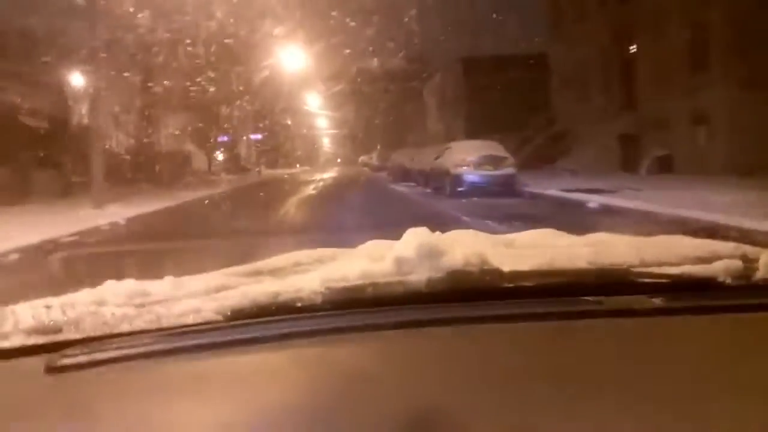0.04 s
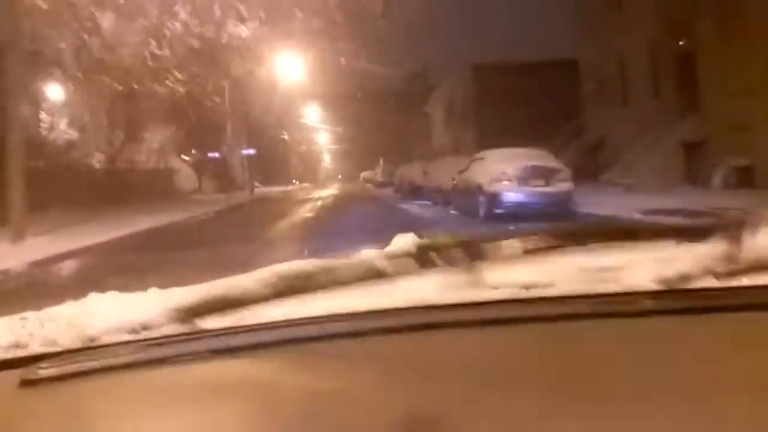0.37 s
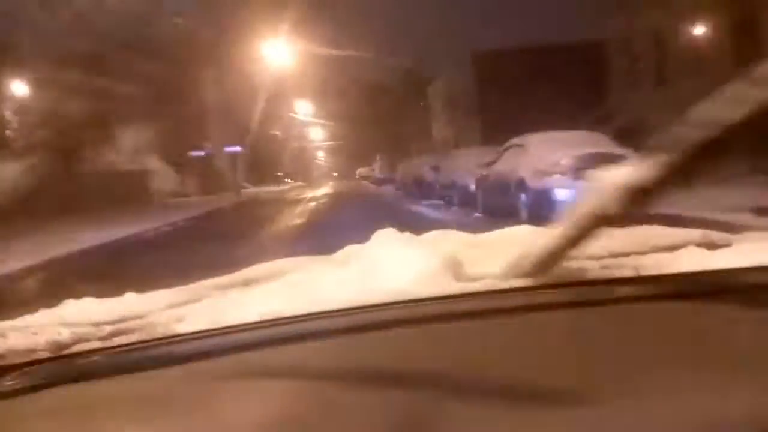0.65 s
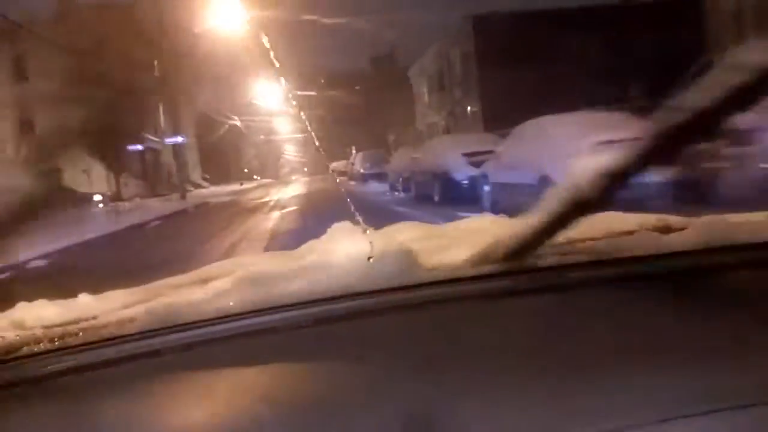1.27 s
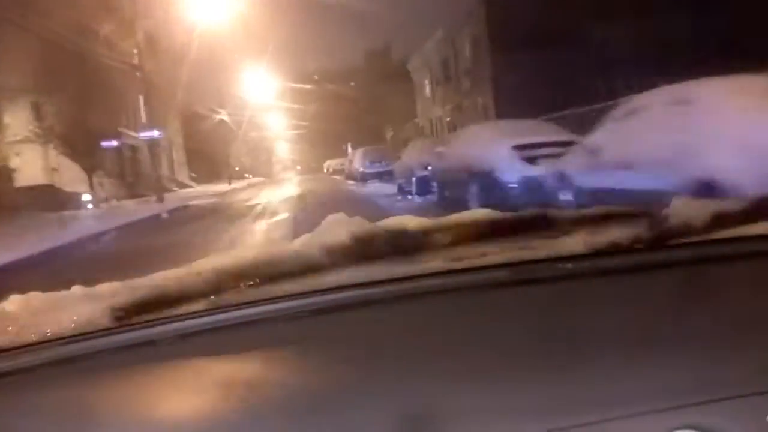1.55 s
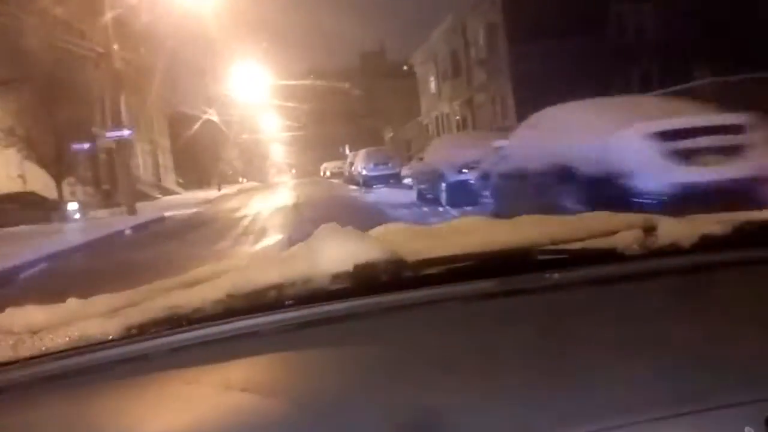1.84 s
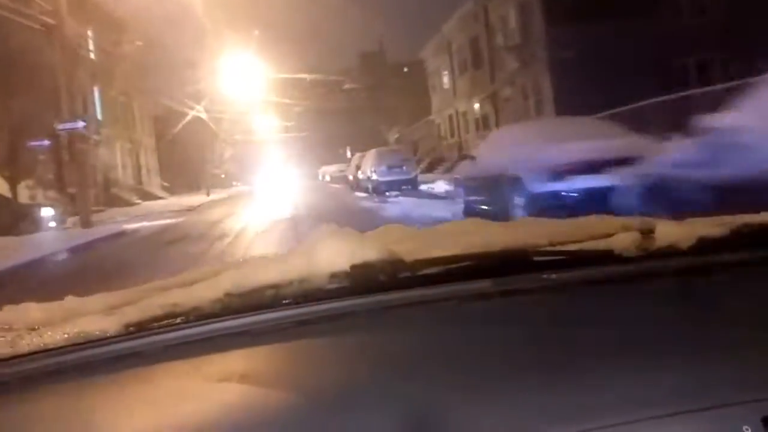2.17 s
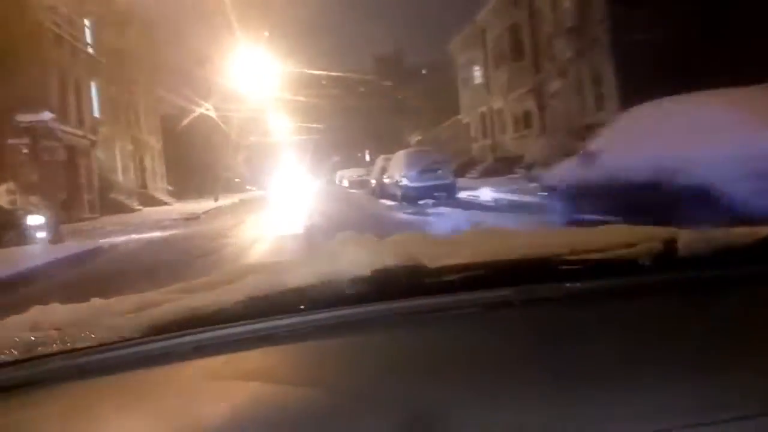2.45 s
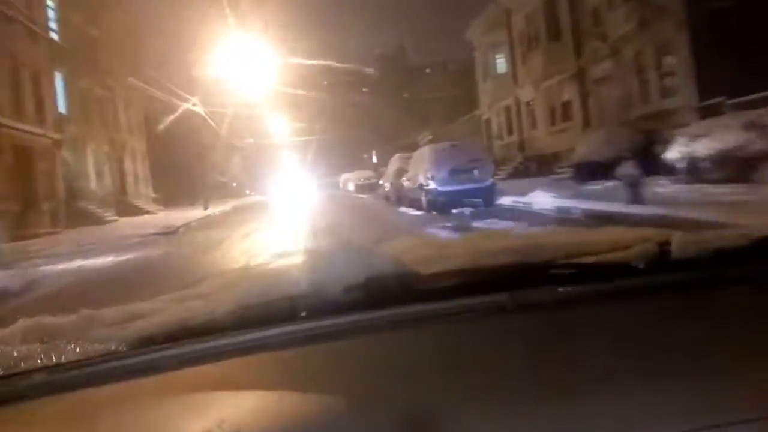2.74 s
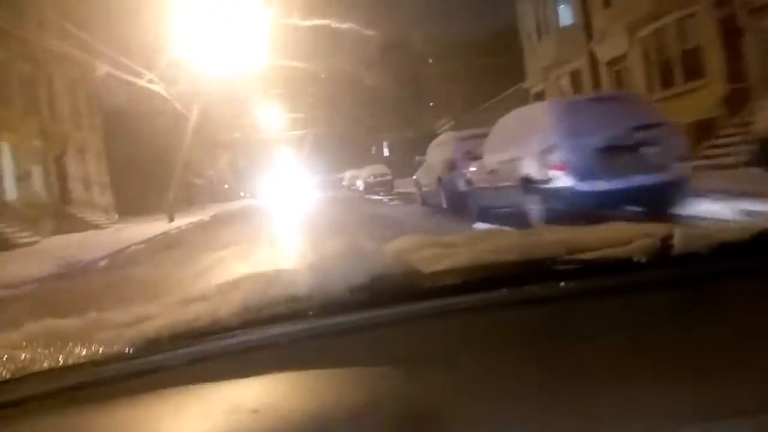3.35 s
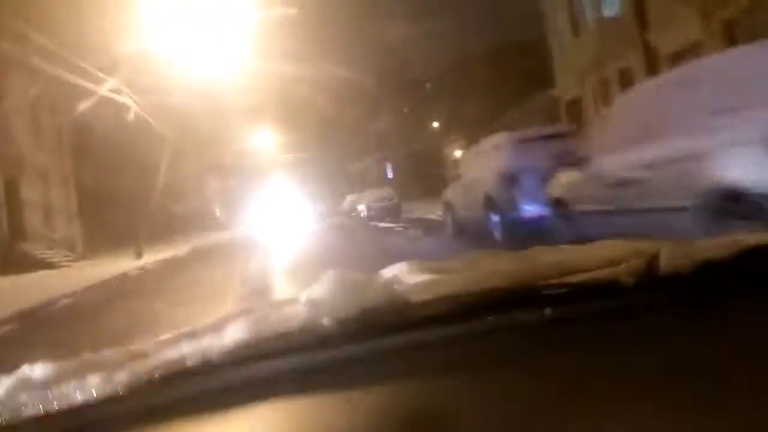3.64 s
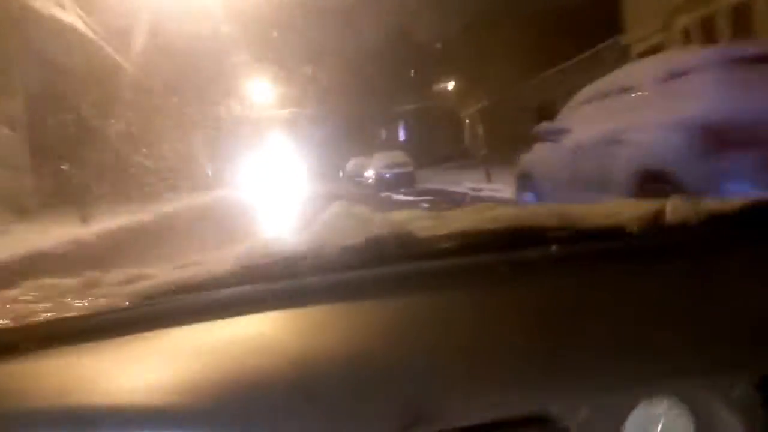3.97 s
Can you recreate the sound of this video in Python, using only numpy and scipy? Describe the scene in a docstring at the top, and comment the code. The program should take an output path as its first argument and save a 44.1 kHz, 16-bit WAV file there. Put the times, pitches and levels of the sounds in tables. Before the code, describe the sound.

Car driving, heard from inside: the engine climbs slightly, then drops to a low boom.

```python
"""Inside a car on a snowy street, a six-cylinder engine gains speed, shifts up and settles into a low boom
as its harmonics sweep through the cabin resonances. Tyres rumble and hiss as broadband noise, and the
heater fan blows with a faint whistle. A bump excites damped vibrations: wheels thump, trim rattles and
the suspension knocks. Soft rustles and sharp ticks sound close by. The two microphones hear the bass
in nearly opposite polarity."""
import sys
import numpy as np
from scipy import signal
from scipy.fft import rfft, irfft
from scipy.io import wavfile

SR = 44100
rng = np.random.default_rng(int(sys.argv[2]) if len(sys.argv) > 2 else 0)


def unload_audio(sound):
    """Save the sound as a 16-bit wav file, at the path given as the first command line argument."""
    columns = np.transpose(np.atleast_2d(sound))
    # keep every value between -1 and 1, then stretch to whole-number steps
    steps = np.round(np.clip(columns, -1, 1) * 32767)
    wavfile.write(sys.argv[1], SR, steps.astype(np.int16))


N = 176400
T = np.arange(N) / SR
HZ = np.fft.rfftfreq(N, 1 / SR)


def amp(db):
    """The decibel scale: amplitude grows tenfold every 20 dB."""
    return 10 ** (np.asarray(db) / 20)


def at_frequency(points, hz):
    """Interpolation of a spectrum on a logarithmic frequency axis."""
    frequencies, values = np.transpose(points)
    return np.interp(np.log(hz + 1), np.log(frequencies + 1), values)


def curve(points):
    """Linear interpolation in time, at every sample."""
    return np.interp(T, *np.transpose(points))


def drift(hz):
    """Random modulation: low-passed Gaussian noise of unit variance."""
    slow = irfft(rfft(rng.standard_normal(N)) * np.exp(-(HZ / hz) ** 2) * (HZ > 0), N)
    return slow / slow.std()


def impact(start, rise, decay):
    """Damping: after a linear rise, the amplitude falls exponentially."""
    age = T - start
    return np.clip(age / rise, 0, 1) * np.exp(-np.maximum(age - rise, 0) / decay)


# Left microphone relative to the right (frequency [Hz], level [dB])
LEFT_LEVEL = [(60, -5.5), (110, -5), (200, -3.5), (400, -4.5), (700, -4.5), (830, -6.5), (1200, -2),
              (2400, -4.8), (3950, -4.5), (4170, -13), (4400, -3.5), (6000, -1), (9000, 0)]
# Phase lead of the left microphone (frequency [Hz], phase [rad])
LEFT_LEAD = [(30, -2.2), (65, -2.55), (120, -2.7), (170, -2.8), (250, -2.45), (350, -2.85), (800, -3.1)]

def left_response(hz):
    """Transfer function from right microphone to left: weaker and nearly inverted."""
    return amp(at_frequency(LEFT_LEVEL, hz)) * np.exp(1j * at_frequency(LEFT_LEAD, hz))


def tone(turns, hz):
    """A sinusoid as a phasor, scaled and rotated at the left microphone."""
    phasor = np.exp(2j * np.pi * turns)
    return np.array([left_response(hz) * phasor, phasor]).imag


# Likeness of the two channels (frequency [Hz], correlation [ratio])
COHERENCE = [(50, .95), (130, .965), (200, .86), (290, .72), (640, .7), (1000, .42), (1400, .18),
             (3100, .04), (15000, -.05)]

def noise(spectrum):
    """Partial coherence: the microphones share most of a noise's bass and little of its treble."""
    right, independent = rfft(rng.standard_normal((2, N)))
    shared = at_frequency(COHERENCE, HZ)
    left = (shared * right + np.sqrt(1 - shared ** 2) * independent) * left_response(HZ)
    return irfft(np.array([left, right]) * amp(at_frequency(spectrum, HZ)), N) * np.sqrt(SR / 2)


# Engine speed (time [s], firing rate [Hz])
FIRING_RATE = [(0, 128), (.55, 131.5), (1.2, 136.2), (1.7, 138), (2.1, 141), (2.5, 142.6), (2.7, 141.3),
               (3.07, 112.5), (3.2, 109), (3.6, 110), (4, 109)]
# Mechanical roar at the highest speed reached (frequency [Hz], spectral density [dB/Hz])
ROAR_SPECTRUM = [(150, -65.5), (260, -70.5), (360, -57.5), (600, -72.5), (770, -70.5), (830, -61),
                 (900, -76), (1400, -74.5), (2200, -82), (4000, -93.5), (9000, -120)]
# Engine harmonics (order [multiple of the cycle rate])
ORDERS = [3, 4, 5, 6, 7, 9, 12, 13, 14, 15, 16, 18, 19, 21, 24]
# Each harmonic before the shift (base level [dB])
LOW_GEAR_LEVELS = [-35.5, -34.5, -50, -30.3, -37.5, -46.5, -43.5, -45.5, -80, -43.5, -48, -44, -57, -62.5,
                   -52]
# Each harmonic after the shift (base level [dB])
HIGH_GEAR_LEVELS = [-41, -49, -44, -18.7, -38, -40.5, -39.5, -54, -47.5, -47.5, -54, -52, -60, -47, -51]
# Swell of all harmonics together (time [s], gain [dB])
HARMONIC_GAIN = [(0, 2.5), (.13, 1), (.18, 0), (.45, 0), (.68, -12), (.9, 0), (2.3, 2), (2.62, 0),
                 (2.85, -1.5), (2.95, -2.5), (3.15, -2), (4, -1)]
# The firing rate's first two overtones sing out at first and in the shift (time [s], gain [dB])
OVERTONE_GAIN = [(0, 3.5), (.13, 3.5), (.18, 0), (2.68, 0), (2.78, 5.5), (2.86, 3.5), (2.94, 6.5),
                 (3.04, 7), (3.12, 0)]
# Cabin peaks and dips (frequency [Hz], half width [Hz], gain [dB])
CABIN_RESONANCES = [(252, 12, 12), (264, 4, -11), (143, 2, -4), (354, 6, 4), (485, 12, 4)]
CYLINDERS, SHIFT_S, SHIFT_LENGTH_S = 6, 2.93, 0.081
WAVER_DB, WAVER_HZ, SPEED_JITTER = 1.8, 9, .003
ROAR_DB_PER_OCTAVE, ROAR_PULSING, ROAR_LOPE = 26.5, 0.3, 0.11

def engine():
    """Forced vibration: harmonics sweep through cabin resonances, and a roar pulses with each firing."""
    firing = curve(FIRING_RATE)
    cycles = np.cumsum(firing * (1 + SPEED_JITTER * drift(WAVER_HZ))) / SR / CYLINDERS
    shifted = np.clip((T - SHIFT_S) / SHIFT_LENGTH_S + .5, 0, 1)
    roar = noise(ROAR_SPECTRUM) * amp(ROAR_DB_PER_OCTAVE * np.log2(firing / firing.max()))
    pulsing = ROAR_PULSING * np.cos(2 * np.pi * CYLINDERS * cycles)
    lope = ROAR_LOPE * np.cos(2 * np.pi * cycles)
    out = roar * (1 + pulsing + lope)
    for order, low_db, high_db in zip(ORDERS, LOW_GEAR_LEVELS, HIGH_GEAR_LEVELS):
        hz = order * firing / CYLINDERS
        lift = sum(db / (1 + ((hz - centre) / width) ** 2) for centre, width, db in CABIN_RESONANCES)
        if order in (2 * CYLINDERS, 3 * CYLINDERS):
            lift = lift + curve(OVERTONE_GAIN)
        waver = WAVER_DB * drift(WAVER_HZ) * (.5 if order == CYLINDERS else 1)
        rms = amp(low_db + (high_db - low_db) * shifted + curve(HARMONIC_GAIN) + lift + waver)
        out += np.sqrt(2) * rms * tone(order * cycles + rng.random(), hz)
    return out


def cabin_ripple(depth_db=1.2, echo_s=.012):
    """Interference: cabin reflections leave fine peaks and dips in the middle and treble."""
    fade = np.exp(-T / echo_s)
    ripple = rfft(rng.standard_normal((2, N)) * fade * (1 - fade)).real
    return amp(depth_db * ripple / ripple.std() * np.clip(HZ / 600 - .5, 0, 1))


# Wash of slush and fan air (frequency [Hz], spectral density [dB/Hz])
WASH_SPECTRUM = [(100, -96), (400, -70.5), (600, -75), (700, -66), (830, -69), (920, -69.5), (1200, -71.5),
                 (1800, -77), (2400, -78), (3100, -79), (4000, -84.5), (5000, -88.5), (5800, -94.5),
                 (7200, -97), (8100, -106), (9300, -104), (10500, -109), (14000, -112), (15500, -120)]
# Swell of the wash (time [s], gain [dB])
WASH_GAIN = [(0, -0.5), (.8, 0), (1.1, -0.2), (1.8, 0.4), (2.08, 0.7), (2.2, -1), (2.32, .5), (2.7, 0.5),
             (3.1, 0.5), (3.45, 0.9), (3.7, 0), (4, 0.5)]
# Road rumble (frequency [Hz], spectral density [dB/Hz])
RUMBLE_SPECTRUM = [(10, -92), (22, -85), (35, -56), (52, -52), (80, -52.5), (120, -46.5), (155, -56),
                   (185, -63.5), (240, -56.5), (300, -60.5), (360, -59.5), (430, -69.5), (490, -62.5),
                   (600, -71.5), (1000, -88), (3000, -120)]
# Swell of the rumble (time [s], gain [dB])
RUMBLE_GAIN = [(0, -7), (.15, 0.5), (.24, -1), (.34, -5.5), (.45, 1), (.8, 0.5), (1.6, -3.5), (2.1, -2),
               (2.8, -3), (3.1, 0), (3.35, 0), (3.7, 0), (4, 0.5)]
# Fizz of wet tyres (frequency [Hz], spectral density [dB/Hz])
FIZZ_SPECTRUM = [(3000, -125), (7000, -106), (9000, -106), (11000, -109), (14000, -109.5), (15500, -116)]
# Swell of the fizz (time [s], gain [dB])
FIZZ_GAIN = [(0, -1), (1.5, -2.5), (2.5, -12), (4, -3)]

def road(flicker_db=.22):
    """Rolling noise: structure-borne tyre rumble under a wash of slush and air, with a fine fizz."""
    wash = irfft(rfft(noise(WASH_SPECTRUM)) * cabin_ripple(), N)
    wash *= amp(curve(WASH_GAIN) + flicker_db * drift(hz=8))
    rumble = noise(RUMBLE_SPECTRUM) * amp(curve(RUMBLE_GAIN))
    fizz = noise(FIZZ_SPECTRUM) * amp(curve(FIZZ_GAIN))
    return rumble + wash + fizz


# Heater fan whistles at the right microphone (frequency [Hz], level [dB])
FAN_TONES = [(1991, -58), (3925, -66.5), (4410, -71.5), (7207, -79)]

def fan(pitch_wander=.0007, waver_db=2):
    """Tonal fan noise: thin, wandering whistles reach the two microphones in phase quadrature."""
    warped_time = np.cumsum(1 + pitch_wander * drift(hz=14)) / SR
    out = np.zeros((2, N))
    for hz, db in FAN_TONES:
        angle = 2 * np.pi * hz * warped_time
        left = amp(at_frequency(LEFT_LEVEL, hz)) * np.cos(angle)
        out += amp(db + waver_db * drift(hz=8.8)) * np.array([left, np.sin(angle)])
    return out


# Wheel impacts (time [s], level [dB], frequency [Hz], decay time [s])
WHEEL_THUMPS = [(0.176, -18.5, 90, 0.038), (0.223, -12.5, 70, 0.057), (0.223, -16.5, 145, .014),
                (.262, -16.5, 111, 0.027), (0.408, -14.5, 139.7, 0.037), (0.466, -13, 70.5, 0.023),
                (3.268, -28, 85, 0.059), (3.333, -17, 70.5, 0.05)]
IMPACT_RISE_S = 0.0024

def wheel_thumps():
    """Damped oscillation: each blow from the wheels rings the body at one low frequency."""
    return sum(amp(db) * impact(start, IMPACT_RISE_S, decay) * tone(hz * (T - start), hz)
               for start, db, hz, decay in WHEEL_THUMPS)


# Bursts of rattling (time [s], gain [dB], decay time [s])
RATTLE_BURSTS = [(.19, -2, .026), (.248, -10, .02), (.718, -7, .015)]
# Rattling trim (frequency [Hz], spectral density [dB/Hz])
RATTLE_SPECTRUM = [(70, -55), (130, -45), (250, -48), (450, -54), (800, -60), (1500, -64), (3000, -72),
                   (6000, -91), (15000, -110)]

def trim_rattles(rise_s=.02):
    """Impact noise: the jolted trim rattles in decaying broadband bursts."""
    envelope = sum(amp(db) * impact(start, rise_s, decay) for start, db, decay in RATTLE_BURSTS)
    return noise(RATTLE_SPECTRUM) * envelope


# Suspension impacts (time [s], gain [dB])
SUSPENSION_KNOCKS = [(.198, -1), (.212, -1), (.254, -3), (.274, -5), (.394, -0.5), (.729, -5.5)]
# Body panel modes (nominal frequency [Hz], level [dB], decay time [s])
PANEL_MODES = [(216, -32.5, .016), (354, -31, 0.013), (472, -29, 0.024), (544, -27, 0.017),
               (737, -28, 0.021), (868, -42, 0.026)]

def suspension_knocks(detune=.03):
    """Modal superposition: each knock briefly rings the body panels, every mode slightly detuned."""
    out = np.zeros((2, N))
    for start, db in SUSPENSION_KNOCKS:
        for hz, mode_db, decay in PANEL_MODES:
            turns = hz * (1 + detune * rng.uniform(-0.85, 1)) * (T - start)
            out += amp(db + mode_db) * impact(start, IMPACT_RISE_S, decay) * tone(turns, hz)
    return out


# Soft rustles (peak time [s], gain [dB], half length [s])
RUSTLE_SWELLS = [(.26, 0, .05), (2.845, -4, .03), (3.235, -5, .03), (3.28, -3, .014), (3.46, -.5, .035),
                 (3.53, -5.5, .022), (3.95, -3.5, .045)]
# Colour of the rustles (frequency [Hz], spectral density [dB/Hz])
RUSTLE_SPECTRUM = [(1000, -105), (3500, -91), (6500, -95), (9000, -98.5), (12000, -101), (15000, -105)]

def rustles(grain_db=3.5):
    """Amplitude modulation: fast random grain roughens bell-shaped swells of treble noise."""
    envelope = sum(amp(db) * np.exp(-((T - peak) / half) ** 2) for peak, db, half in RUSTLE_SWELLS)
    return noise(RUSTLE_SPECTRUM) * envelope * amp(grain_db * drift(hz=302))


# Sharp ticks (time [s], gain [dB], decay time [s])
TICK_BURSTS = [(0.26, -15, 0.0045), (1.458, -2.5, .003), (1.464, -13.5, 0.012)]
# Colour of the ticks (frequency [Hz], spectral density [dB/Hz])
TICK_SPECTRUM = [(1500, -100), (4000, -76), (5300, -73), (6000, -72), (6700, -67), (7400, -79), (8300, -85),
                 (11000, -92), (14000, -89), (16000, -94)]

def ticks(rise_s=0.0044):
    """Transients: bright noise lasting only milliseconds is heard as a tick."""
    envelope = sum(amp(db) * impact(start, rise_s, decay) for start, db, decay in TICK_BURSTS)
    return noise(TICK_SPECTRUM) * envelope


def scene():
    """Linear superposition: the pressures of all sources add in the cabin."""
    return engine() + road() + fan() + wheel_thumps() + trim_rattles() + suspension_knocks() \
        + rustles() + ticks()


LOW_CUT_HZ, HIGH_CUT_HZ = 30, 15300

def record(dry):
    """Band limiting: a high-pass and a low-pass filter remove the deepest bass and highest treble."""
    thinned = irfft(rfft(dry) * HZ ** 4 / (HZ ** 4 + LOW_CUT_HZ ** 4), N)
    low_pass = signal.firwin(511, HIGH_CUT_HZ, window=("kaiser", 9), fs=SR)
    return signal.oaconvolve(thinned, low_pass[None], "same")


dry = scene()
out = record(dry)
unload_audio(out)
```